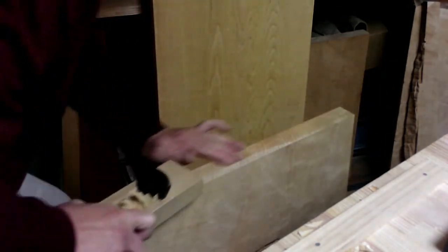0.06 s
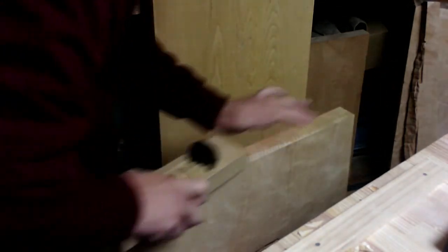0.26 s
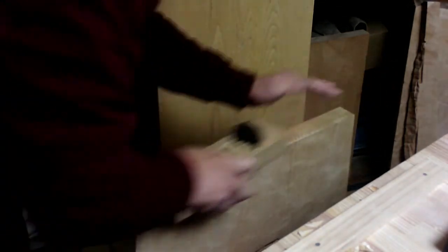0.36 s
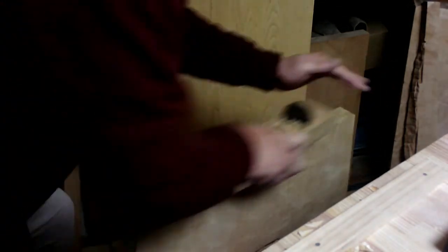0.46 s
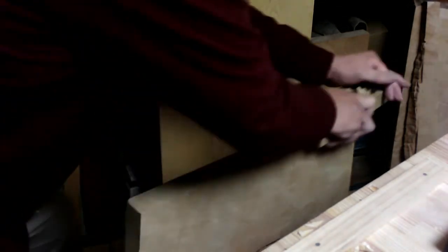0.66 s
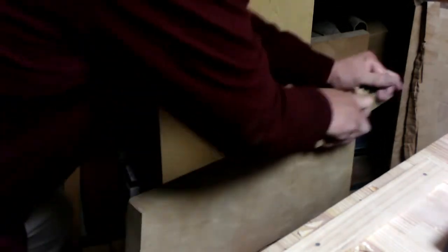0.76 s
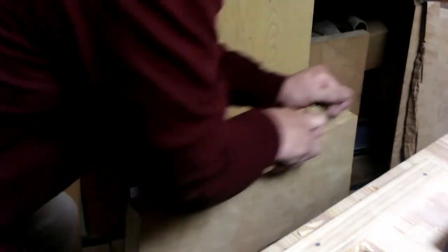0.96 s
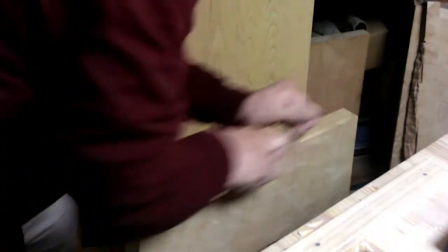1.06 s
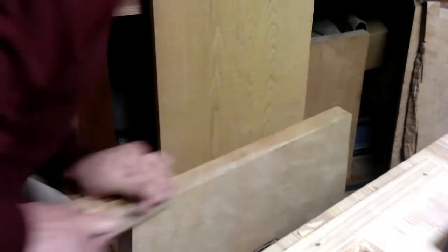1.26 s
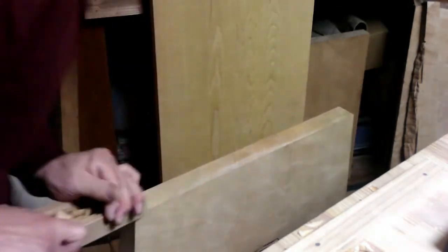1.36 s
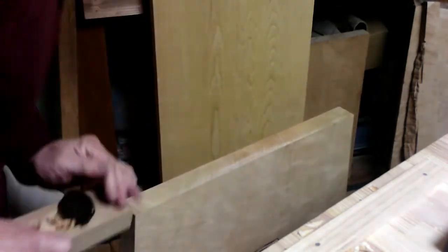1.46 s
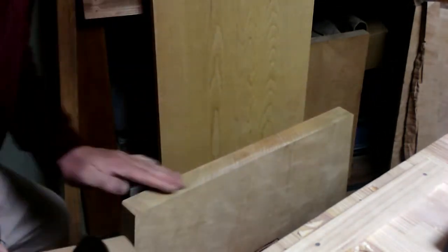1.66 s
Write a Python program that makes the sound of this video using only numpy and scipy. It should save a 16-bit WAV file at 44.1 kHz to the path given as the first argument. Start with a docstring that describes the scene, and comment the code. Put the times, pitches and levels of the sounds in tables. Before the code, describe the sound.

Wood planing: faint hissing push, hollow wooden knocks, then one harsh, bright scraping pull stroke

```python
"""A hand plane works the edge of an upright wooden board in a small workshop, over a quiet rumble.
It slides forward lightly: grains of noise make the sole hiss and the board grumble.
Knocks excite the board's modes, and brief squeaks swell as narrow bands of noise; the plane stops.
It is pulled back in one rasping cut: the blade snaps fibres, random impulses that ring the iron.
Plane body and board colour the sound with their modes, and the room adds a decaying noise tail."""
import sys
import numpy as np
from scipy import signal
from scipy.fft import rfft, irfft
from scipy.io import wavfile

SR = 44100
rng = np.random.default_rng(int(sys.argv[2]) if len(sys.argv) > 2 else 0)


def file_out(sig):
    """Save sig as 16-bit WAV at sys.argv[1]."""
    # one column per channel
    cols = np.atleast_2d(sig).T
    # limit, then scale
    lim = np.clip(cols, -1, 1)
    pcm = np.round(lim * 32767).astype(np.int16)
    wavfile.write(sys.argv[1], SR, pcm)


N = 74970
TIME = np.arange(N) / SR


def from_db(db):
    """Level to amplitude: 20 dB is a factor of ten."""
    return 10 ** (np.asarray(db) / 20)


def rms_one(x):
    """Normalisation to unit mean power."""
    return x / np.sqrt(np.mean(x ** 2) + 1e-20)


def in_time(rows):
    """Linear interpolation of (t/s, value) rows over the whole scene."""
    return np.interp(TIME, *np.transpose(rows))


def decay(age, t60_s):
    """Exponential decay by 60 dB in one reverberation time."""
    return np.exp(-np.log(1000) * age / t60_s)


def cut(x, hz, kind, order=2):
    """Butterworth filtering: a maximally flat low- or high-pass."""
    sos = signal.butter(order, np.clip(hz, 10, .45 * SR), kind, fs=SR, output="sos")
    return signal.sosfilt(sos, x)


def colour(x, spectrum):
    """Spectral weighting by (f/Hz, gain/dB) rows, joined on a logarithmic axis; unit power."""
    hz, db = np.transpose(spectrum)
    bins = np.maximum(np.arange(N // 2 + 1) * SR / N, 1)
    gain = from_db(np.interp(np.log(bins), np.log(hz), db))
    return rms_one(irfft(rfft(x) * gain, N))


def resonance(x, hz, width_hz):
    """A single damped resonator: its pole radius sets the bandwidth, its gain at the peak is 1."""
    r = np.exp(-np.pi * width_hz / SR)
    feedback = [1, -2 * r * np.cos(2 * np.pi * hz / SR), r * r]
    return signal.lfilter([(1 - r * r) / 2, 0, (r * r - 1) / 2], feedback, x)


def ring(x, modes, scatter_db):
    """Modal superposition: decaying sines of alternating sign, their levels scattered by chance."""
    out = 0
    for k, (hz, db, t60_s) in enumerate(modes):
        r, w = decay(1 / SR, t60_s), 2 * np.pi * hz / SR
        gain = (-1) ** k * from_db(db + scatter_db * rng.normal())
        # the tiny constant keeps the filter from running on vanishing numbers
        mode = signal.lfilter([0, np.sin(w)], [1, -2 * r * np.cos(w), r * r], x + 1e-18)
        out = out + gain * mode
    return out


def grains(per_s, spread_db):
    """Shot noise: random impulses of either sign and uneven size; unit power."""
    sizes = from_db(spread_db * np.minimum(rng.exponential(1, N), 4))
    signs = rng.choice([-1, 1], N)
    return rms_one(sizes * signs * (rng.random(N) < per_s / SR))


def judder(rate_hz, depth_db):
    """Amplitude modulation by low-passed noise: uneven grip over the wood grain, as a gain."""
    grip = rms_one(cut(rng.standard_normal(N), rate_hz, "low"))
    return rms_one(from_db(depth_db * grip))


def narrow_noise(hz, width_hz):
    """Quadrature modulation: two slow noises on a carrier make an unsteady tone; unit power."""
    phase = 2 * np.pi * np.cumsum(hz * np.ones(N)) / SR
    a, b = cut(rng.standard_normal((2, N)), width_hz / 2, "low")
    return rms_one(a * np.cos(phase) + b * np.sin(phase))


def plane_body(x):
    """High modal density: a decaying noise stands for crowded modes, which change along the stroke."""
    t60_s, change_s, direct = 0.086, .11, 0.67
    out, age = np.zeros(N), TIME[:SR // 10]
    for middle in np.arange(0, N / SR + change_s, change_s):
        near = np.abs(TIME - middle) / change_s
        fade = np.sqrt(np.maximum(1 - near, 0))  # equal-power crossfade between sets of modes
        tail = rms_one(rng.standard_normal(len(age)) * decay(age, t60_s))
        out += signal.fftconvolve(x * fade, tail)[:N]
    return rms_one(direct * x + rms_one(out))


def rumble():
    """Stationary noise: a steady random background weighted towards the bass."""
    # spectrum of the background: f/Hz, gain/dB
    floor_colour = [(25, -10.5), (60, -4.5), (100, -11), (200, -10), (600, -15.5), (1500, -31), (8000, -34)]
    level_db = -61.5
    return from_db(level_db) * colour(rng.standard_normal(N), floor_colour)


def sole():
    """Friction noise: dense grains hiss on the wood, with a thin whistle of wandering pitch."""
    # pressure of the sliding sole, heard as its hiss, forward and then back: t/s, level/dB
    push = [(0.0, -60), (0.01, -66), (0.046, -60), (0.234, -42.5), (0.362, -41), (0.6, -54), (0.644, -45),
            (0.716, -52.5), (0.724, -48), (0.802, -42), (0.832, -60), (0.876, -66), (0.9, -56.5)]
    pull = [(0.93, -67.5), (0.974, -41), (0.996, -36.5), (1.112, -30.5), (1.28, -26), (1.334, -36),
            (1.356, -29.5), (1.408, -27.5), (1.43, -41.5), (1.6, -54.5), (1.672, -67.5), (1.7, -71)]
    # spectrum of the hiss: f/Hz, gain/dB
    hiss_colour = [(1200, -32), (2000, -24.5), (3300, -10.5), (5000, -10.5), (7000, -9.5), (9000, -7),
                   (10500, -3.5), (12000, -9), (13500, -15.5), (15500, -45)]
    # centre of the whistle: t/s, f/Hz
    whistle_centre = [(0, 11200), (.25, 10900), (.47, 11350), (.65, 10650), (.78, 10600), (1.03, 10450),
                      (1.27, 10700), (1.4, 10750), (1.55, 11150), (1.7, 11100)]
    whistle_width_hz, whistle_db = 1360, -2.5  # level relative to the hiss
    hiss = colour(grains(per_s=14000, spread_db=1), hiss_colour)
    whistle = narrow_noise(in_time(whistle_centre), whistle_width_hz)
    sliding = plane_body(hiss + from_db(whistle_db) * whistle)
    pressure = from_db(in_time(list(push) + list(pull)))
    return pressure * judder(rate_hz=310, depth_db=1.02) * sliding


def rubbing():
    """Slip excitation: small slips under the sole make the board grumble."""
    # course of the low rubbing, before the common gain: t/s, level/dB
    rub_course = [(0, -82), (.17, -56.5), (.31, -50), (.355, -39), (.43, -53.5), (.5, -50), (.6, -46),
                  (.75, -48), (.815, -36.5), (.86, -51), (.95, -58), (1.02, -37), (1.1, -49.5),
                  (1.165, -39.5), (1.2, -46.5), (1.28, -48), (1.32, -40.5), (1.36, -41), (1.4, -41),
                  (1.44, -46), (1.53, -46), (1.6, -58), (1.7, -70)]
    # spectrum of the rubbing: f/Hz, gain/dB
    rub_colour = [(40, -28), (110, -8.5), (200, -4.5), (350, -2), (560, -0.5), (1000, -3), (1550, -6.5),
                  (2200, -12.5), (3300, -12), (6000, -29)]
    gain_db = 0.5
    slips = plane_body(grains(per_s=2500, spread_db=2.5))
    return from_db(gain_db + in_time(rub_course)) * colour(slips, rub_colour)


def workshop(x):
    """Diffuse reverberation: dense, slightly dull reflections decay as noise in a small room."""
    t60_s, dull_hz, gap_s = 0.28, 6460, 0.0044
    tail = cut(rng.standard_normal(N), dull_hz, "low", order=1)
    tail = tail * decay(TIME, t60_s) * (TIME > gap_s)
    tail = tail / np.sqrt(np.sum(tail ** 2)) / 2  # total energy 1/4
    return signal.fftconvolve(x, tail)[:N]


def knocks():
    """Impact excitation: a blow and a spell of chatter drive the board's modes, over a dense thud."""
    # the plane bumps the board: t/s, level before the common gain/dB, brightness low-pass f/Hz,
    # bass cut f/Hz, favoured pitch f/Hz, its boost/dB, chatter length/s
    bumps = [(.198, -20.5, 1170, 60, 560, 0.5, 0.023), (.2, -27, 1650, 490, 1410, 7, 0.032),
             (0.232, -25, 920, 110, 515, 9, 0.037), (0.325, -32.5, 3500, 252, 2270, 15.5, 0.018),
             (.523, -28.5, 1880, 194, 605, 6, 0.053), (.532, -28.5, 1230, 237, 1020, 14.5, 0.0094),
             (0.658, -22, 450, 140, 194, 2.5, 0.046), (.661, -30, 2410, 326, 660, 8.5, 0.031),
             (.815, -37, 1480, 198, 950, 14.5, 0.019), (0.871, -39.5, 900, 149, 620, 8, .004),
             (1.014, -26, 110, 25, 63, 12, 0.052), (1.018, -25.5, 280, 130, 245, 8.5, 0.057),
             (1.31, -41, 400, 30, 62, 15, .03), (1.39, -26, 232, 25, 57.6, 10, .035)]
    # modes of board and plane: f/Hz, level/dB, t60/s
    board_modes = [(62, -20, .15), (195, -5, .13), (264, -4, .14), (303, -5, .14), (377, -7, .12),
                   (441, -6, .13), (572, -1, .13), (654, -2, .16), (765, -5, .11), (860, -7, .1),
                   (1015, -2, .06), (1184, -10, .12), (1360, -3, .09), (1450, -4, .1), (1660, -9, .1),
                   (2330, -10, .08)]
    gain_db, chatter_per_s, chatter_size = -12.5, 900, 0.25
    thud_db, thud_lowpass_hz = -1.5, 1520
    release_t60_s = 0.038  # added to a slower decay that runs from the blow onwards
    out, age = np.zeros(N + SR), TIME[:SR // 2]
    for s, db, bright_hz, bass_hz, favoured_hz, boost_db, chatter_s in bumps:
        release = decay(np.maximum(age - chatter_s, 0), release_t60_s)
        contact = release * np.exp(-age / (2 * chatter_s))
        hits = rng.standard_normal(len(age)) * (rng.random(len(age)) < chatter_per_s / SR)
        force = chatter_size * hits * contact
        force[0] = 1  # the first blow
        thud = rms_one(cut(rng.standard_normal(len(age)), thud_lowpass_hz, "low"))
        body = ring(force, board_modes, scatter_db=1) + from_db(thud_db) * thud * contact
        body = cut(cut(body, bright_hz, "low"), bass_hz, "high")
        favoured = resonance(body, favoured_hz, 0.12 * favoured_hz)
        body = body + (from_db(boost_db) - 1) * favoured
        start = int(s * SR)
        out[start:start + len(age)] += from_db(db + gain_db) * body
    return out[:N]


def squeaks():
    """Stick and slip: the catching sole squeaks and the board groans in short swells of narrow-band noise."""
    # swells: middle t/s, length/s (amplitude is down to e^-2 this far from the middle),
    # f/Hz, level/dB
    swells = [(.455, .06, 11550, -52), (.675, .03, 182, -40), (.7, .04, 660, -38), (.735, .025, 3130, -48),
              (.745, .05, 10560, -48), (1.045, .035, 200, -39), (1.2, .06, 132, -49),
              (1.39, .04, 1525, -40), (1.47, .04, 625, -51), (1.52, .05, 1570, -51),
              (1.51, .07, 11100, -52)]
    out = np.zeros(N)
    for s, length, hz, db in swells:
        swell = np.exp(-2 * ((TIME - s) / length) ** 2)
        width_hz = 32 + .02 * hz
        out += from_db(db) * swell * narrow_noise(hz, width_hz)
    return out


def blade():
    """Fracture noise: fibres snap at the edge and set the iron and the body ringing."""
    # bite of the blade, heard as its rasp: t/s, level/dB
    bite = [(0.94, -62.5), (1.02, -32), (1.166, -26), (1.196, -31), (1.236, -26), (1.324, -44.5),
            (1.35, -64), (1.394, -32), (1.448, -45.5), (1.534, -51.5), (1.65, -97), (1.7, -79)]
    # spectrum of the rasp: f/Hz, gain/dB
    rasp_colour = [(500, -22), (900, -2.5), (1650, -2), (2000, -3), (2600, 2.5), (4200, -2.5), (5800, -5.5),
                   (7500, -12), (10000, -18), (15000, -22)]
    # modes of the plane's iron under the cut: f/Hz, level/dB
    iron_modes = [(1184, -7), (1527, -7), (1682, -1), (1868, -3), (2540, -2), (2855, -1), (3348, -2),
                  (3660, -2), (4207, -2), (4398, 0), (5475, -3), (5955, 1), (8942, -4), (9426, -2)]
    iron_t60_s, rasp_db, iron_db = 0.092, -1.5, -9.5
    snaps = grains(per_s=5000, spread_db=4.0)
    iron = ring(snaps, [(hz, db, iron_t60_s) for hz, db in iron_modes], scatter_db=4.5)
    rasp = colour(plane_body(snaps), rasp_colour)
    cutting = from_db(rasp_db) * rasp + from_db(iron_db) * rms_one(iron)
    return from_db(in_time(bite)) * cutting


def scene():
    """Superposition: direct scrape and knocks, their reverberation and the rumble add up."""
    scrape_send_db, knock_send_db = -14, -6  # levels fed into the room
    scrape = sole() + rubbing() + squeaks() + blade()
    bumps = knocks()
    room = workshop(from_db(scrape_send_db) * scrape + from_db(knock_send_db) * bumps)
    return (scrape + bumps + room + rumble())[None]


def record(dry):
    """Band limitation: a steep elliptic low-pass removes the top of the spectrum."""
    cutoff_hz, ripple_db, stop_db = 15500, .2, 80
    sos = signal.ellip(10, ripple_db, stop_db, cutoff_hz, fs=SR, output="sos")
    return signal.sosfilt(sos, dry)


dry = scene()
out = record(dry)
file_out(out)
```